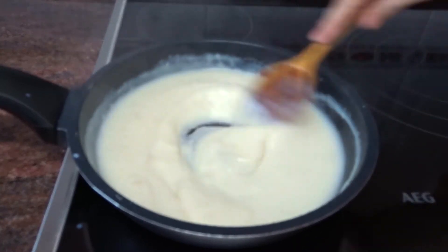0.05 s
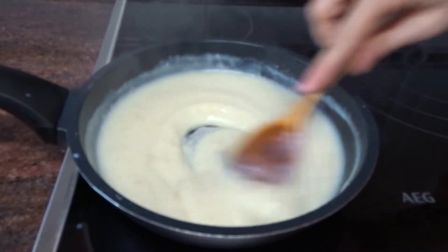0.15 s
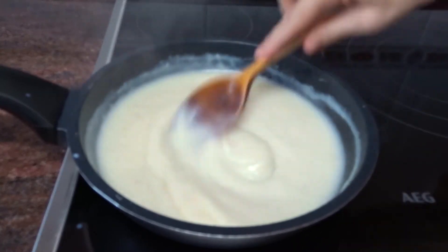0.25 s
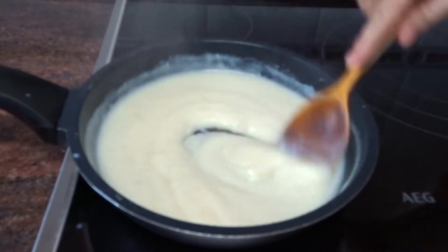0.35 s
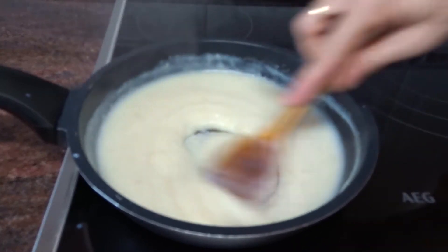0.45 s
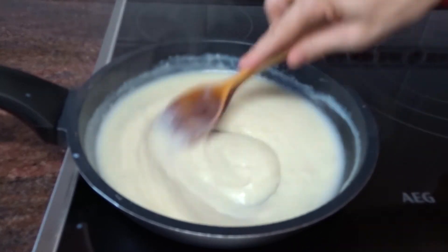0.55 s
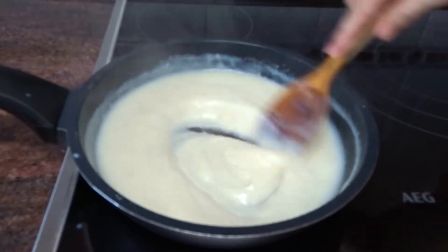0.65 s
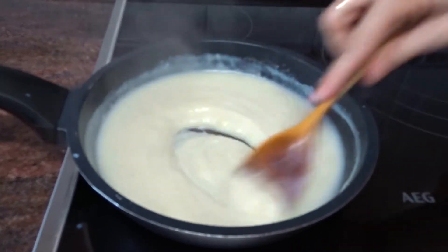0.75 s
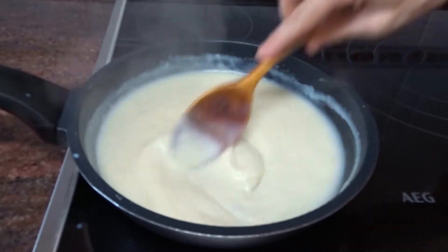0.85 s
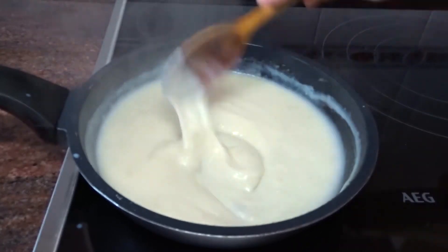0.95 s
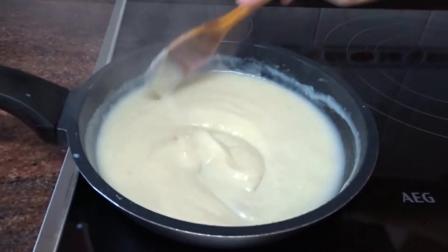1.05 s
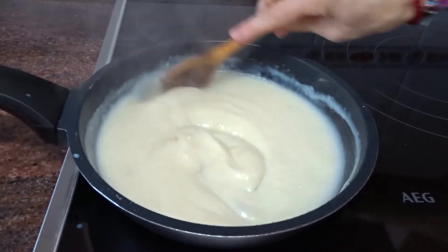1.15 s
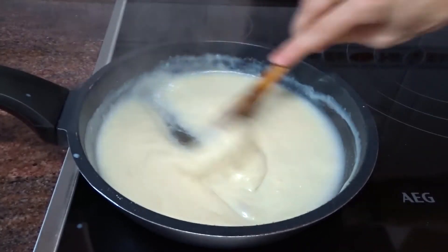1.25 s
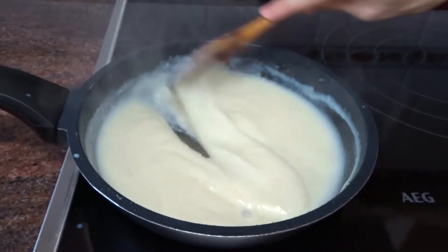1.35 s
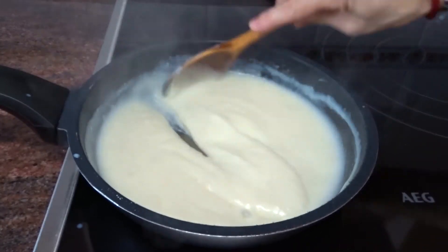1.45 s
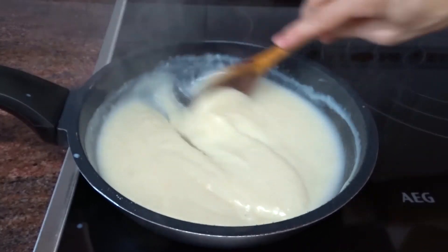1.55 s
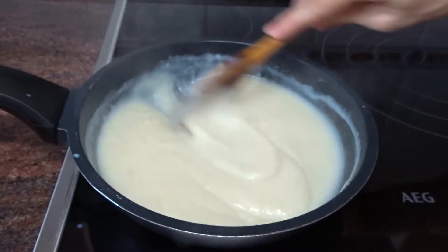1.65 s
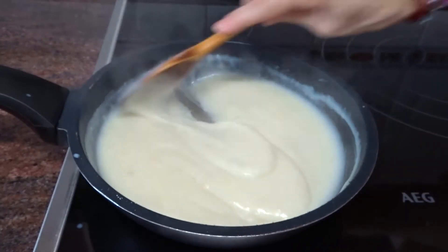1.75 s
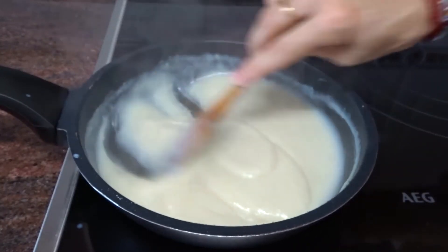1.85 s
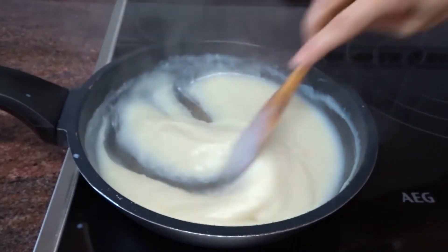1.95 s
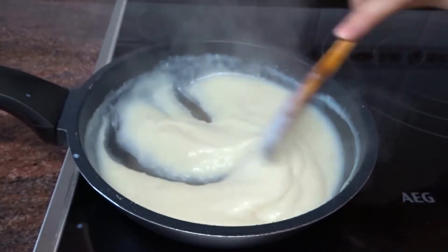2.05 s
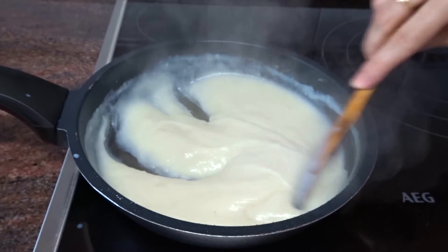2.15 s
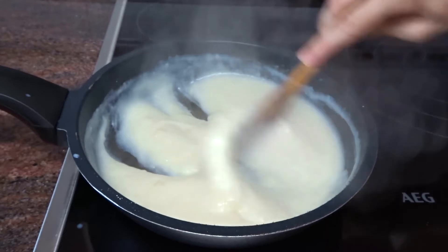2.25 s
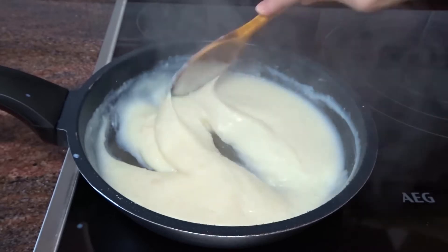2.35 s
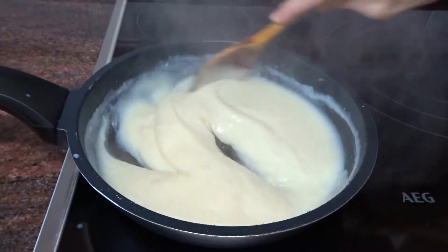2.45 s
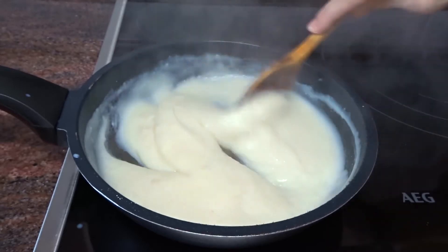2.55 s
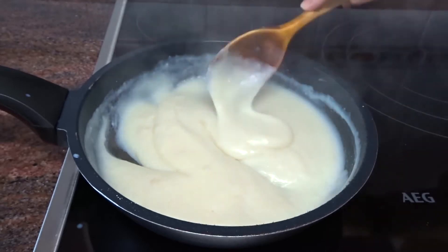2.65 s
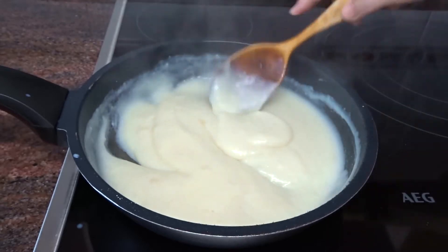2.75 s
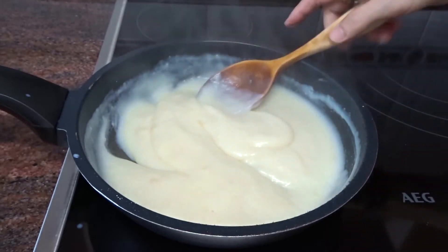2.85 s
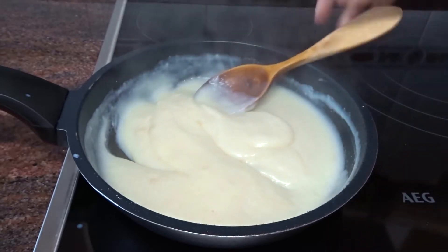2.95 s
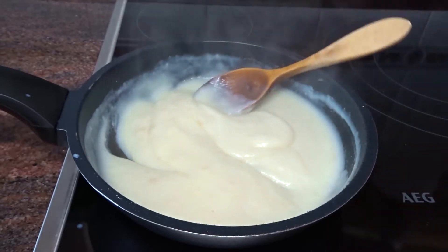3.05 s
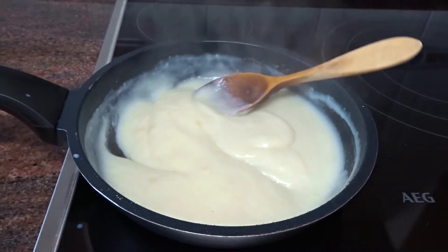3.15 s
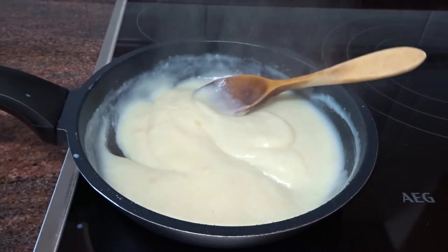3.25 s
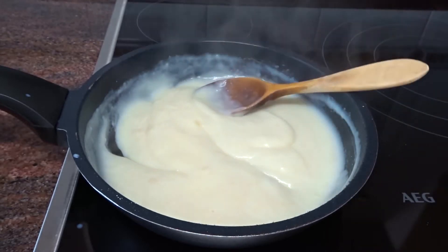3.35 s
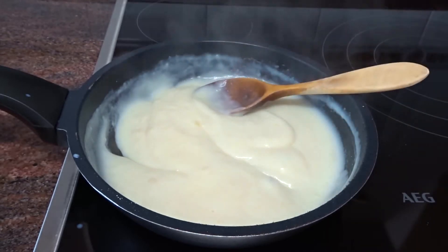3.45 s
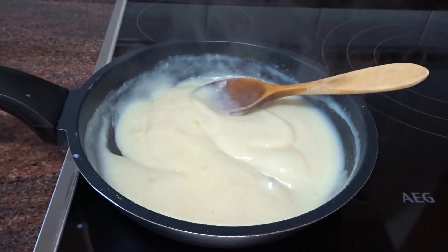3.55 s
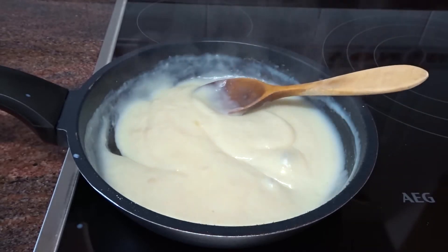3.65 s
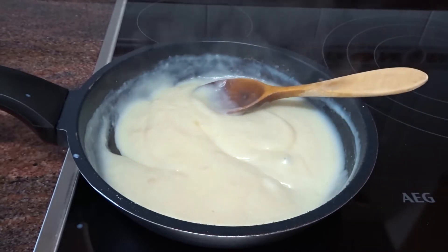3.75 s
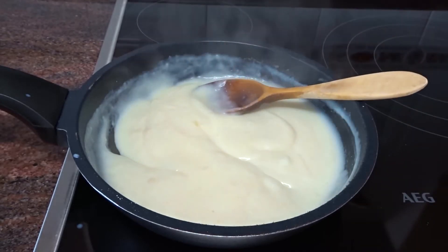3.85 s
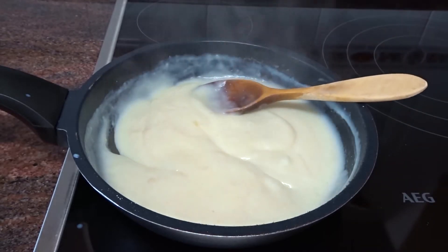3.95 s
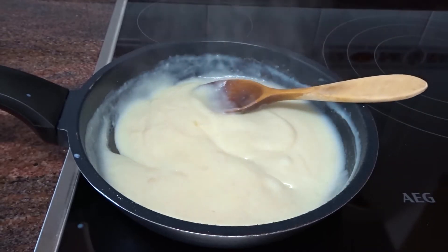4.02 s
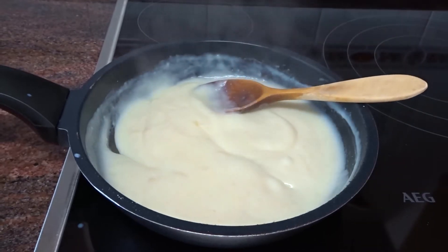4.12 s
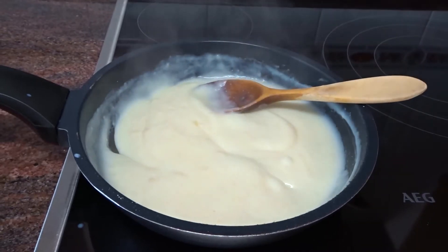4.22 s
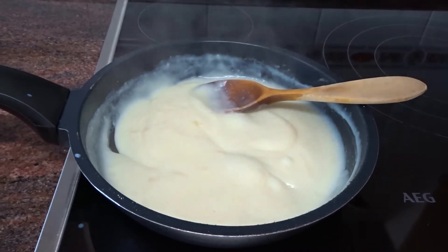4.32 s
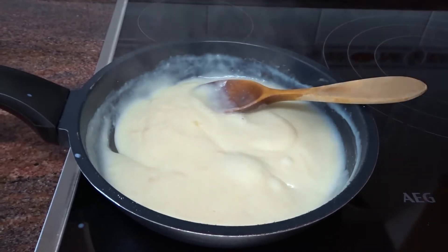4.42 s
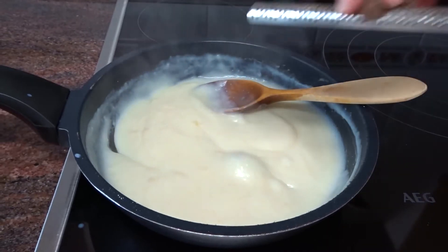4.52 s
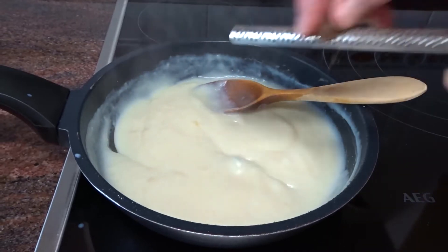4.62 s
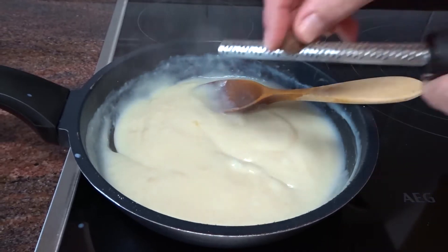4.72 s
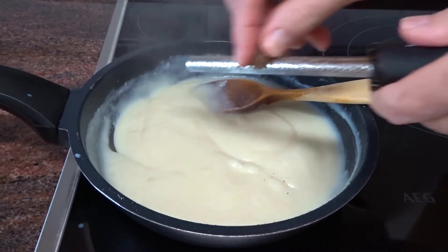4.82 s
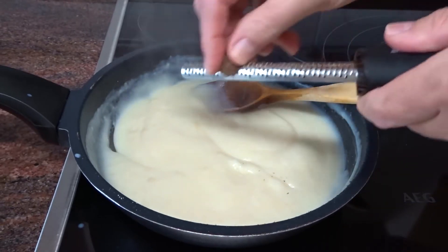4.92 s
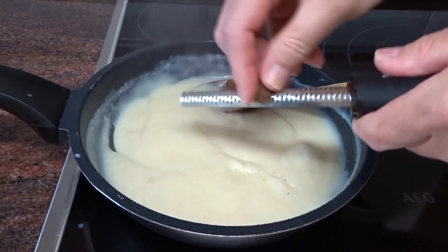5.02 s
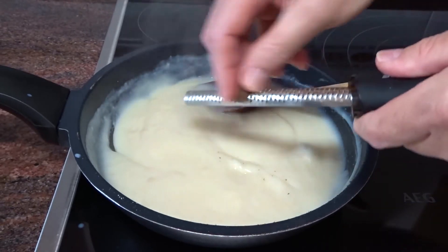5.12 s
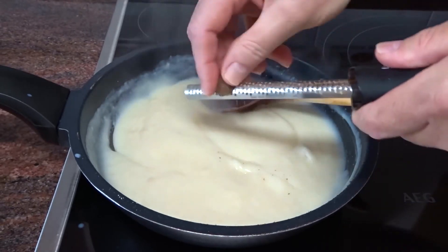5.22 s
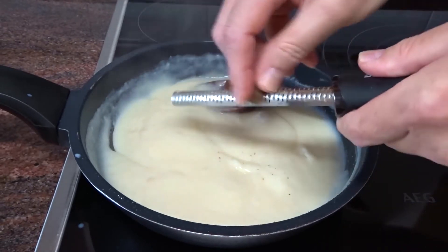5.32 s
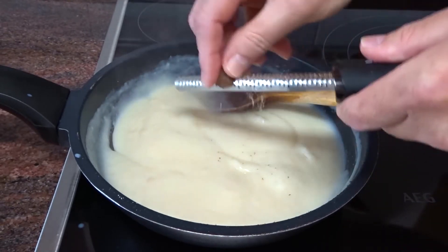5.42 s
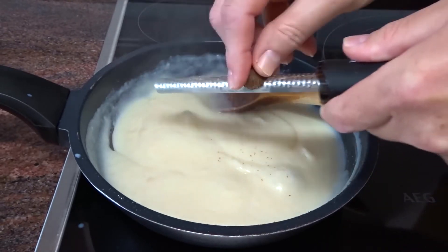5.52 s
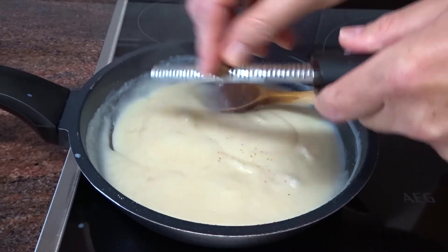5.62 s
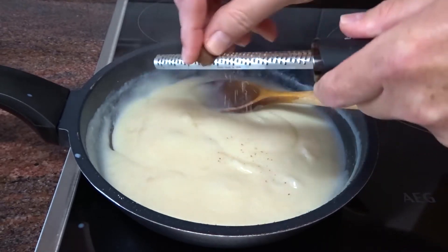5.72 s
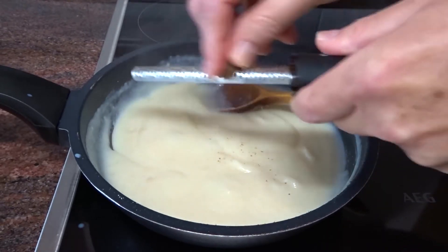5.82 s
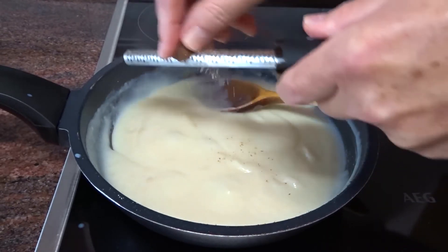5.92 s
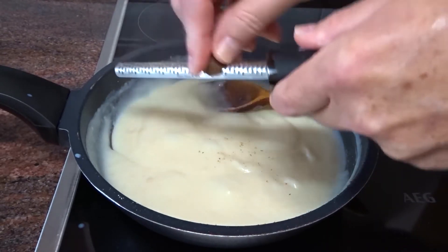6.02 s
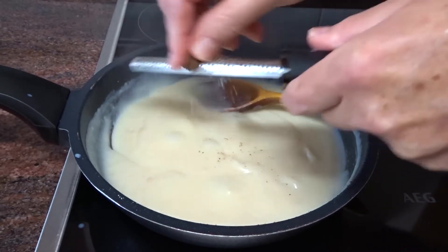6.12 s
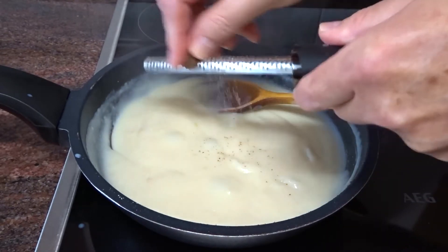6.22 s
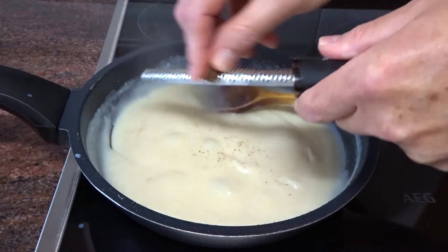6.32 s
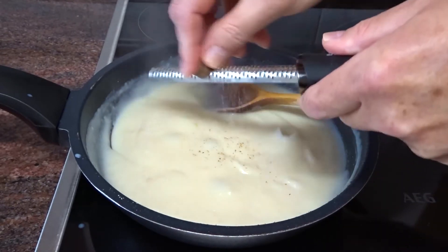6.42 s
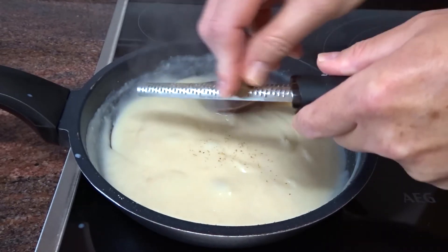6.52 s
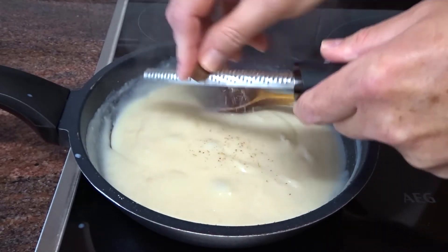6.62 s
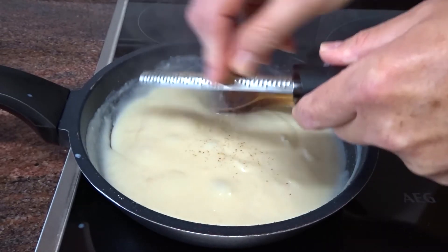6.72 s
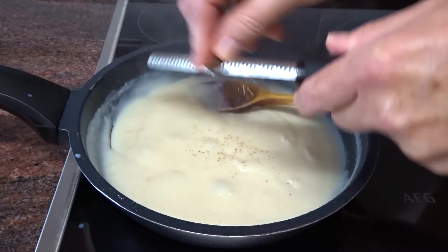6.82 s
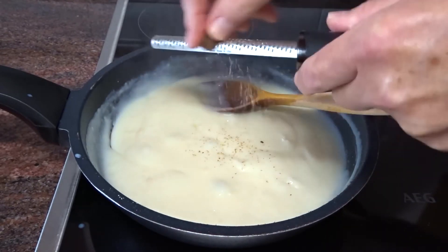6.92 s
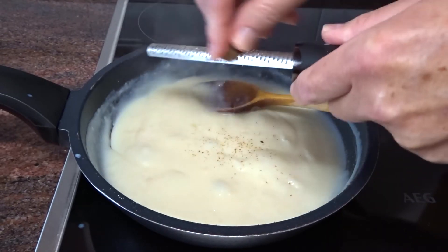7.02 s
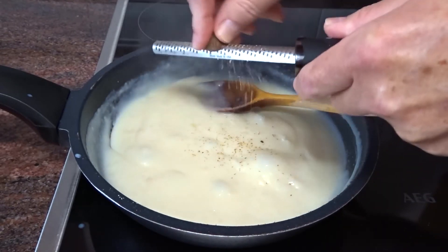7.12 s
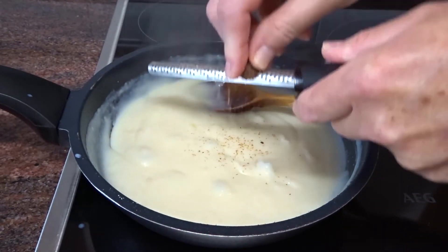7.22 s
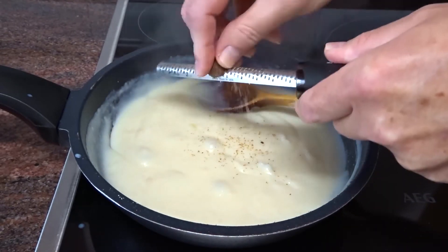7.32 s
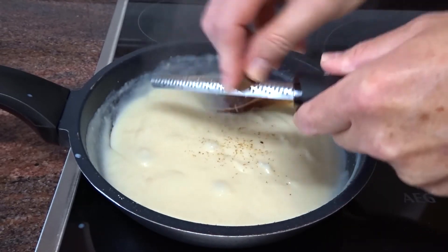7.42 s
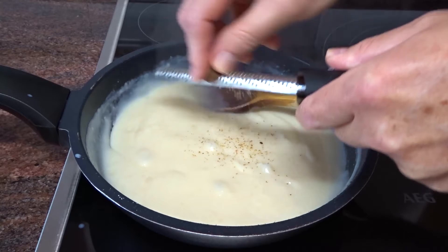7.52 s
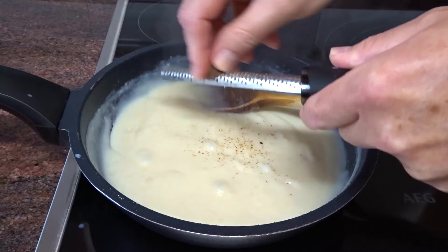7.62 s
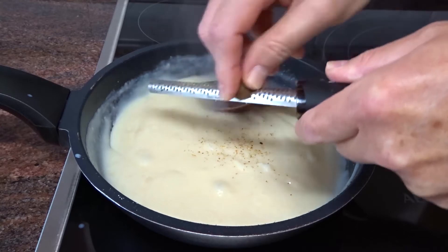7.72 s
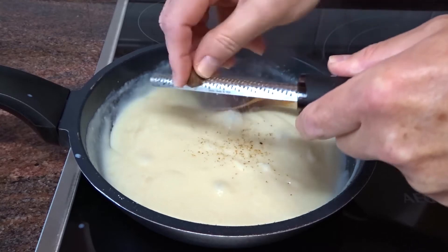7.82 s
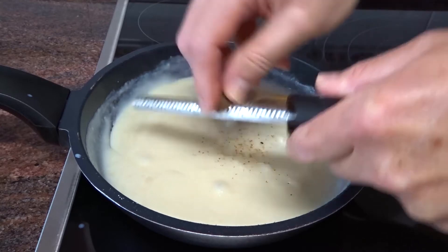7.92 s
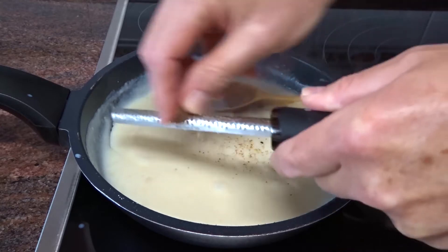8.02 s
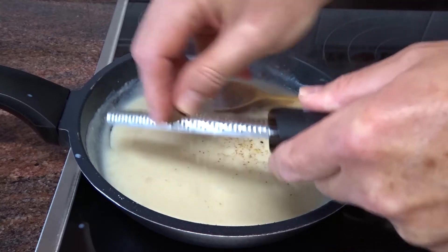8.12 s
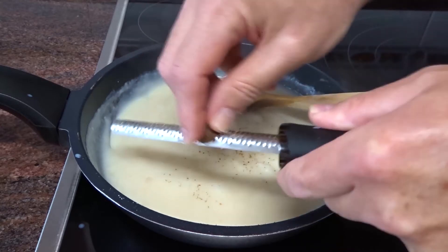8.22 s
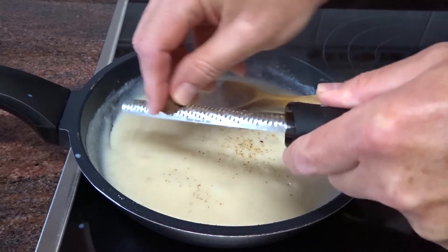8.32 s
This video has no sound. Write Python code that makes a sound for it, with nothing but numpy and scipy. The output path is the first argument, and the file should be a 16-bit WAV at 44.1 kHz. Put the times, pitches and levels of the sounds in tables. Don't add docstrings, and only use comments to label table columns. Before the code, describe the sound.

A close microphone in a small, hard-walled kitchen with a soft steady hum. From 0 to 1.3 seconds a wooden spoon pushes thick sauce over a heavy pan floor: wet hollow rumbles, stuttering scrapes and hiss. Wooden knocks strike the pan wall at about 1.4, 1.8, 2.1, 2.4 and 2.8 seconds; the fourth is hardest and brightest, each leaving a short metallic ring, with brief wet scrapes between. Around 3.1 the handle slides and clinks lightly on the rim. Until 4.5 it is nearly quiet, with faint scrapes, small pops and a low tap near 4.05. At about 4.6 grating starts faintly, growing full by 5.1: dry, bright, toothy strokes to and fro, roughly eight a second, pushes usually stronger than pulls. The blade buzzes and rings slightly, with little pings as teeth snag, continuing to the end at about 8.4 seconds.

```python
import sys
import numpy as np
from scipy import signal
from scipy.fft import rfft, irfft, next_fast_len
from scipy.io import wavfile
from scipy.ndimage import uniform_filter1d

SR = 44100
rng = np.random.default_rng(int(sys.argv[2]) if len(sys.argv) > 2 else 0)


def volts(x):
    e = np.asarray(x, float) / 20
    return 10 ** e


def generate_wav(sig):
    pcm = np.round(np.clip(np.atleast_2d(sig).T, -1, 1) * 32767).astype(np.int16)
    wavfile.write(sys.argv[1], SR, pcm)


N = 369116

# (frequency [Hz], side re mid [dB])
STEREO_WIDTH = [(60, -14), (110, 2), (200, -16), (380, -14), (700, -14.5), (1290, -8), (2380, -7),
                (4400, -4), (8120, -0.5), (15000, -2)]


def rms_one(x):
    return x / np.sqrt(np.mean(x ** 2) + 1e-20)


def at_hz(points, hz):
    table_hz, values = np.transpose(points)
    return np.interp(np.log(hz + 1), np.log(table_hz), values)


def colour(x, spectrum):
    size = next_fast_len(N)
    gain = volts(at_hz(spectrum, np.fft.rfftfreq(size, 1 / SR)))
    return irfft(rfft(x, size) * gain, size)[..., :N]


def butter(x, order, hz, kind):
    return signal.sosfilt(signal.butter(order, hz, kind, fs=SR, output="sos"), x)


def split(x, low_hz, high_hz):
    cuts = [(low_hz, "low"), ([low_hz, high_hz], "band"), (high_hz, "high")]
    return [np.roll(rms_one(butter(x, 3, hz, kind)), 999 * k, axis=1) for k, (hz, kind) in enumerate(cuts)]


def drift(rate):
    r = np.exp(-80 * np.pi * rate / SR)
    slow = signal.lfilter([1], [1, -2 * r, r * r], rng.standard_normal(N // 40 + 2002))[2000:]
    return np.interp(np.arange(N) / 40, np.arange(len(slow)), rms_one(slow))


def ring(x, hz, t60):
    r, w = volts(-60 / (t60 * SR)), 2 * np.pi * hz / SR
    return signal.lfilter([0, np.sin(w)], [1, -2 * r * np.cos(w), r * r], x + 1e-18)


def resonate(x, hz, width):
    r = np.exp(-np.pi * width / SR)
    top = [(1 - r * r) / 2, 0, (r * r - 1) / 2]
    return rms_one(signal.lfilter(top, [1, -2 * r * np.cos(2 * np.pi * hz / SR), r * r], x))


def wavering(x, peaks, patchy_db, rate, db_per_octave=0):
    out = 0
    for hz, width, db in peaks:
        level_db = db + patchy_db * drift(rate) + db_per_octave * np.log2(hz / 4700)
        out = out + volts(level_db) * resonate(x, hz, width)
    return rms_one(out)


def contacts(per_s, spread_db):
    sizes = volts(spread_db * np.minimum(rng.exponential(1, (2, N)), 4)) * rng.standard_normal((2, N))
    grains = rms_one(sizes * (rng.random((2, N)) < per_s / SR))
    grains[1] = colour(grains[1], STEREO_WIDTH)
    return grains


def swells(rows, attack_s, release_db_per_s):
    t, power = np.arange(N) / SR, np.zeros(N)
    for s, hold, db in rows:
        span = slice(max(int(s * SR), 0), int((s + hold + .5) * SR))
        age = t[span] - s
        rise = np.sin(np.pi / 2 * np.clip(age / attack_s, 0, 1)) ** 2
        power[span] += (rise * volts(db - release_db_per_s * np.maximum(age - attack_s - hold, 0))) ** 2
    return np.sqrt(power)


def spoon_drag():
    # (frequency [Hz], density [dB per Hz])
    drag_colour = [(71, -67), (120, -77), (249, -36), (312, 3.5), (794, 10.5), (1080, 0.5), (1520, 10.5),
                   (1980, 4), (2910, 4.5), (3790, -3.5), (4940, -5), (12800, -14), (15400, -15.5)]
    # (start [s], hold [s], rumble [dB], pitch of the wet hollow [Hz])
    shoves = np.array([(-.03, 0.031, -43.5, 685), (0.04, 0.12, -48.5, 825), (0.173, 0.16, -46, 736),
                       (0.357, 0.041, -44.5, 850), (0.458, 0.15, -46.5, 715), (0.684, 0.12, -44.5, 760),
                       (0.937, 0.027, -56.5, 724), (1.137, 0.072, -44, 1040), (1.501, 0.021, -43, 1041),
                       (1.85, 0.034, -42, 1030), (2.174, 0.032, -44.5, 955), (2.415, 0.013, -37.5, 990),
                       (2.874, 0.023, -61, 880), (3.279, 0.022, -57.5, 816), (3.668, .08, -74, 1170),
                       (3.875, .03, -62, 760), (3.934, 0.036, -60, 1240), (4.048, 0.033, -47.5, 930),
                       (4.336, 0.0067, -65, 1130), (4.545, 0.038, -58, 1070)])
    # (start [s], hold [s], scrape [dB], hiss re scrape [dB])
    skids = np.array([(-.03, 0.066, -49.5, 0.5), (0.03, 0.066, -42, -3), (0.19, 0.014, -41.5, -5.5),
                      (0.299, 0.082, -42.5, -1.5), (0.486, 0.073, -45.5, -7.5), (0.621, 0.056, -45, 1),
                      (0.68, 0.13, -49, -10), (0.853, 0.14, -55, -2.5), (1.24, 0.024, -56.5, 4),
                      (1.427, 0.062, -49.5, -5), (1.486, 0.15, -55, -7), (1.742, 0.02, -51.5, 4.5),
                      (2.096, .02, -70.5, 18), (2.178, 0.088, -47, -29), (2.263, 0.2, -72, 12),
                      (2.495, 0.0081, -45.5, -6), (2.6, 0.15, -64, -2.5), (3.016, 0.16, -59, -17),
                      (3.614, 0.14, -57.5, -7), (3.978, 0.033, -73, 12.5), (4.142, 0.16, -62.5, -1)])
    # (frequency [Hz], width [Hz], level [dB])
    pan_floor = [(1600, 140, -2.5), (1930, 200, -2.5), (2240, 130, 3.5), (2920, 380, -0.5),
                 (3870, 420, -3.5), (4760, 240, -15.5)]
    # (start [s], hold [s], level [dB])
    rim_slides = [
        (2.96, .01, -64.5),
        (3.065, 0.1, -61),
    ]
    shove_attack_s, skid_attack_s, skid_release_db_per_s = .025, .03, 142.5
    shove = swells(shoves[:, :3], shove_attack_s, release_db_per_s=168)
    skid = swells(skids[:, :3], skid_attack_s, skid_release_db_per_s)
    hiss_rows = skids[:, :3] + skids[:, 3:] * [0, 0, 1]
    hiss = swells(hiss_rows, skid_attack_s, skid_release_db_per_s)
    scrape_gain = np.hypot(skid, volts(-9) * shove)
    hiss_gain = np.hypot(hiss, volts(-36) * shove)

    grains = contacts(per_s=7800, spread_db=2.6)
    low, middle, high = split(colour(grains, drag_colour), low_hz=1500, high_hz=4560)
    hollow_hz = np.interp(np.arange(N) / SR, shoves[:, 0] + shove_attack_s, shoves[:, 3])
    hollow = sum(resonate(grains, hz, .14 * hz) * volts(-70 * np.log2(hz / hollow_hz) ** 2)
                 for hz in np.geomspace(480, 1450, num=7))
    stutter = drift(26)
    tightness = volts(9 * np.log2(hollow_hz / 850))
    rumble = (0.87 * low + 0.59 * tightness * hollow) * volts(1.64 * drift(9.4))
    scrape = .8 * middle + .55 * wavering(grains, pan_floor, patchy_db=2.5, rate=8)
    sound = shove * rumble
    sound += scrape_gain * scrape * volts(2.2 * stutter)
    sound += hiss_gain * high * volts(1.9 * stutter)

    rim = ring(grains[0], 1170, .6) + 0.66 * ring(grains[0], 597, 0.2) + 0.49 * ring(grains[0], 4670, 0.16)
    song = swells(rim_slides, 0.055, 240) * rms_one(rim)
    return volts(-7.5) * sound + volts(1.0) * grips(grains) + song * [[1], [.2]]


def grips(grains):
    # (middle [s], length [s], level [dB], frequency [Hz])
    grip_rows = [(.005, .03, -49, 1740), (.045, 0.063, -53.5, 1690), (.1, .1, -53, 1530),
                 (.09, 0.059, -52, 3100), (.12, 0.11, -50.5, 2800), (0.085, .05, -56, 4900),
                 (0.16, .05, -58.5, 4100), (.22, .07, -53, 2270), (.232, .051, -55, 4400),
                 (.4, .08, -51, 1560), (0.46, .1, -56.5, 2770), (.372, .061, -52.5, 4900),
                 (.56, .07, -55.5, 3000), (.56, .05, -53, 1480), (0.84, 0.044, -55, 1850),
                 (0.82, .045, -61, 4700), (.73, .08, -50.5, 2380), (.735, .07, -54, 2850),
                 (.72, .05, -52, 1580), (.815, .085, -52.5, 926), (1.2, .11, -48.5, 1170),
                 (1.21, 0.1, -47, 950), (1.2, 0.12, -52, 2240), (1.21, 0.073, -56.5, 1770),
                 (1.555, 0.075, -43.5, 1226), (1.55, 0.074, -44.5, 917), (1.54, 0.063, -53, 3360),
                 (1.545, 0.068, -54, 4150), (4.63, 0.13, -59.5, 2460), (4.63, 0.15, -59, 4600),
                 (4.65, .1, -55, 5500), (4.51, 0.099, -62.5, 4400)]
    out = np.zeros((2, N))
    for s, length, db, hz in grip_rows:
        size = int(length * SR * 1.5)
        at = int(s * SR) - size // 2
        rubbing = grains[:, N // 2 + at // 3:][:, :size]
        swell = volts(db) * np.hanning(size) * resonate(rubbing, hz, 0.088 * hz)
        out[:, max(at, 0):at + size] += swell[:, max(-at, 0):]
    return out


def room_tone():
    # (frequency [Hz], level [dB])
    hum_colour = [(88, -72), (215, -26), (297, -10.5), (502, -5.5), (587, -0.5), (901, -4), (2340, -2.5),
                  (8640, -19), (11100, -89), (11800, -70), (15800, -74)]
    # (time [s], level [dB])
    lull = [
        (3.3, 0),
        (3.45, -3.5),
        (3.6, -2.5),
        (3.7, -2.5),
        (4.0, 0),
    ]
    tone = rms_one(colour(rng.standard_normal((2, N)), hum_colour) * volts([[0], [-4.0]]))
    lull_db = np.interp(np.arange(N) / SR, *np.transpose(lull))
    tone = volts(-64.5 + 0.11 * drift(2.3) + lull_db) * tone
    tone[1] -= 0.22 * tone[0]
    return tone


def ticks():
    # (time [s], peak [dB], frequency [Hz], t60 [s])
    pops = [(0.5395, -34, 2120, 0.0048), (0.605, -33, 2100, 0.0044), (0.9906, -43, 4930, 0.0052),
            (1.4227, -17.5, 5500, 0.00096), (1.4226, -27, 3260, 0.0012), (1.7, -39, 1600, .005),
            (4.358, -48, 3600, 0.0027), (1.351, -50, 1320, 0.0058), (2.391, -42, 2520, 0.0055),
            (1.6569, -41.5, 3500, 0.003), (1.7, -34.5, 3080, 0.0026), (2.5334, -38.5, 2160, 0.0067),
            (3.1596, -46, 2053, 0.047), (3.159, -37, 3300, 0.0018), (3.4853, -45.5, 2470, 0.0045),
            (3.9885, -35.5, 2140, 0.003), (4.4378, -42, 4660, 0.0049)]
    # (time [s], peak [dB], frequency [Hz], t60 [s])
    plops = [
        (1.148, -50, 1120, 0.0078),
        (1.525, -31.5, 1186, 0.033),
        (1.898, -23, 1175, 0.005),
        (3.298, -52, 1160, 0.021),
        (4.054, -26.5, 990, 0.0044),
        (4.357, -44.5, 1500, 0.0094),
        (4.576, -48, 1190, 0.017),
        (6.402, -29, 1240, 0.0055),
    ]
    # (time [s], peak [dB], frequency [Hz], t60 [s])
    clink = [
        (3.158, -40.5, 2660, 0.016),
        (3.161, -52, 4370, .012),
        (3.163, -50, 5960, 0.023),
    ]
    # (time [s], peak [dB], frequency [Hz], t60 [s])
    snags = [(5.0765, -26, 4500, 0.006), (5.0936, -34, 2170, 0.028), (5.2183, -28, 2150, 0.028),
             (5.2692, -30, 2200, 0.028), (5.339, -22.5, 4700, .006), (6.300, -25, 4400, .006),
             (5.7306, -37, 2290, 0.031), (5.7501, -33.5, 2160, 0.028), (5.8364, -33, 2110, 0.031),
             (6.0717, -41, 2110, 0.028), (6.0789, -36, 2330, 0.028), (6.2011, -43, 2115, 0.028),
             (6.2202, -33, 2080, 0.026), (6.4128, -28.5, 2380, 0.028), (6.463, -35, 2100, 0.028),
             (6.5513, -34, 2360, 0.028), (6.5573, -32.5, 2280, 0.028), (6.664, -30, 2220, 0.032),
             (6.782, -35, 2190, 0.025), (6.7947, -34, 2800, 0.028), (6.8077, -23.5, 2335, 0.034),
             (6.9184, -39, 2200, 0.028), (6.9374, -35.5, 2240, 0.03), (6.9604, -42, 2190, 0.026),
             (7.0332, -31.5, 2080, 0.028), (7.1504, -35, 2100, 0.031), (7.2352, -27, 4300, 0.008),
             (7.2652, -28, 2150, 0.028), (7.37, -27.5, 2120, 0.028), (7.473, -37, 2140, 0.028),
             (7.6099, -30, 2070, 0.028), (7.7346, -37, 2050, 0.031), (7.7456, -31, 2080, 0.03),
             (7.763, -25, 2020, 0.023), (7.7845, -19, 2060, 0.015), (7.8567, -25.5, 2540, 0.021),
             (7.8688, -30, 2090, 0.028), (7.9909, -33, 2200, 0.028), (8.1197, -29, 2197, 0.028),
             (8.1352, -26, 2160, 0.017), (8.2311, -33, 1750, 0.028), (8.2669, -28.5, 2150, 0.028)]
    softer_snags = [(s, db - 9, hz, t60) for s, db, hz, t60 in snags]
    out, click = np.zeros(N), np.zeros(2000)
    click[0] = 1
    for s, db, hz, t60 in pops + plops + clink + softer_snags:
        at = round((s + 0.00066) * SR)
        upper = ring(click, min(hz * 1.81, 14000), t60 * 0.51)
        out[at:at + 2000] += volts(db + 0.5) * (ring(click, hz, t60) - 0.66 * upper)
    return butter(out, 2, [450, 11000], "band")


def knocks():
    knock_s = [1.4280, 1.7630, 2.1280, 2.4078, 2.7968]
    # (peak [dB], knock [Hz], knock t60 [s], crack [dB], hob thump [dB])
    blows = [
        (-22, 1430, 0.0063, -21, -59),
        (-16.5, 1630, 0.0056, -11.5, -53),
        (-17.5, 1970, 0.015, -22, -77),
        (-5, 2200, 0.0031, -11, -50),
        (-18.5, 1940, 0.007, -23.5, -52.5),
    ]
    # (base rings [dB], wall rings [dB], rim rings [dB], place along the rim [radians])
    landings = [
        (-6, -18, -18, 0.54),
        (-2, -5, -21, 0.797),
        (-10, -12, -19, 0.42),
        (0.5, 2, 9.5, 0.5),
        (-19, -8.5, -14, 0.8),
    ]
    blow_top_hz = [12000, 9000, 7000, 8000, 4800]
    # (frequency [Hz], t60 [s], level [dB])
    base = [(454.7, 0.32, -37.5), (565, 0.38, -49.5), (703, 0.07, -48), (930, 0.045, -45.5),
            (1075, 0.12, -42.5), (1137, 0.1, -29), (1181, 0.21, -33.5), (1240, 0.37, -48.5),
            (1470, 0.65, -76), (1750, 0.071, -27.5)]
    # (frequency [Hz], t60 [s], level [dB])
    wall = [(1830, 0.089, -39), (1877, 0.046, -57.5), (1920, 0.17, -35), (1950, 0.086, -42),
            (2360, 0.021, -29), (2533, 0.29, -37), (2650, 0.45, -37.5), (2820, 0.12, -29.5),
            (3090, 0.062, -28.5)]
    # (frequency [Hz], t60 [s], level [dB])
    rim = [(3900, 0.2, -56), (4200, 0.049, -48), (4840, 0.12, -47.5), (5030, 0.1, -56), (6700, 0.18, -68.5)]
    # (which blow [index], frequency [Hz], level [dB], t60 [s])
    accents = [(0, 1284, -32, 0.028), (0, 1850, -30.5, 0.012), (0, 3030, -38, 0.036), (1, 896, -35.5, 0.15),
               (1, 1170, -32.5, 0.2), (1, 3130, -36, .14), (1, 3350, -40, .07), (2, 998, -35, .15),
               (2, 1150, -29, 0.077), (2, 1900, -34.5, 0.14), (2, 2120, -25, 0.03), (3, 880, -27.5, 0.044),
               (3, 1736, -27, .06), (3, 2060, -30.5, 0.11), (3, 2900, -41, 0.11), (3, 4530, -36, .05),
               (4, 882, -34, 0.076), (4, 1190, -27, 0.042), (4, 2460, -30.5, 0.066),
               (4, 4110, -39.5, 0.073), (4, 4570, -40, 0.025), (4, 2620, -34.5, 0.06),
               (4, 1500, -37, 0.036), (1, 2050, -43, .07), (1, 2346, -35.5, 0.07), (3, 4280, -30, 0.03),
               (2, 3060, -41.5, .14), (2, 3300, -42, .03), (4, 2980, -33, .02), (4, 3618, -44, .06),
               (4, 215, -66.5, 1.1), (2, 1660, -30, 0.036), (2, 1418, -35, 0.088), (4, 1720, -32.5, .06),
               (1, 443, -44.5, 0.18), (4, 452, -52.5, 0.26)]
    # (frequency [Hz], t60 [s], level [dB])
    hob = [(218, .25, -10), (200, .25, -11), (165, .25, -17), (255, .15, -14)]
    out, click = np.zeros(N), np.zeros(int(.8 * SR))
    click[:9] = np.hanning(9) / 4
    fade = volts(-60 * np.arange(len(click)) / SR / 0.027)
    judders = rng.standard_normal((len(blows), len(click))) * fade * volts(-30)
    for k, (db, knock_hz, knock_t60, crack_db, thump_db) in enumerate(blows):
        wood = ring(click, knock_hz, knock_t60) - 1.76 * ring(click, knock_hz * 0.58, knock_t60 * 0.38)
        crack = ring(click, 2900, 0.0014) + 0.38 * ring(click, 4200, 0.0036)
        blow = volts(db) * wood + volts(crack_db) * crack

        base_db, wall_db, rim_db, place = landings[k]
        modes = [(*mode, base_db) for mode in base]
        modes += [(*mode, wall_db) for mode in wall]
        modes += [(*mode, rim_db) for mode in rim]
        for m, (hz, t60, mode_db, part_db) in enumerate(modes):
            node_db = 4 * np.cos((m + 1) * place)
            struck = ring(click + judders[k] * 0.28 / t60, hz, t60 * 0.36)
            blow += (-1) ** m * volts(mode_db + part_db + node_db) * struck
        for which, hz, mode_db, t60 in accents:
            if which == k:
                blow += volts(mode_db) * ring(click + 0.71 * judders[k], hz, t60)
        for hz, t60, level_db in hob:
            blow += volts(thump_db + level_db) * ring(click + judders[k], hz, t60)
        at = round(knock_s[k] * SR)
        out[at:at + len(blow)] += butter(blow, 3, blow_top_hz[k], "low")
    return out


def grater():
    # (start [s], length [s], level [dB], lean to the end [dB])
    pushes = [(4.59, 0.083, -48.5, 7.5), (4.824, 0.089, -44, 7), (5.078, 0.091, -40.5, 2.5),
              (5.335, 0.085, -39, 1.5), (5.572, 0.098, -40, 2), (5.832, 0.079, -39, 6.5),
              (6.073, 0.081, -36, 3), (6.296, 0.078, -39, 6), (6.543, 0.081, -37.5, 2.5),
              (6.782, 0.082, -35, 6.5), (7.016, 0.081, -36.5, 4.5), (7.234, 0.084, -40, 8.5),
              (7.476, 0.1, -39, 1), (7.727, 0.087, -38, 5), (7.978, 0.1, -40.5, 0),
              (8.223, 0.094, -37, 0.5)]
    # (start [s], length [s], level [dB], lean to the end [dB])
    pulls = [(4.725, 0.092, -56.5, -5), (4.955, 0.078, -45, 9), (5.21, 0.077, -41.5, 4),
             (5.458, 0.065, -42, 3.5), (5.711, 0.07, -42, 2), (5.961, 0.066, -43.5, 2),
             (6.207, 0.084, -45.5, -8.5), (6.418, 0.087, -42.5, -1.2), (6.659, 0.075, -43, 5),
             (6.917, 0.072, -43, -3.5), (7.134, 0.067, -45, -3), (7.368, 0.072, -44.5, -5),
             (7.621, 0.072, -43.5, -2), (7.854, 0.084, -43.5, -2), (8.114, 0.06, -42.5, 2.5),
             (8.345, 0.045, -40.5, 7)]
    # (low ring of the blade [dB], brightness of the steel [dB per octave])
    stroke_tones = [(-65, -5), (-66, -6), (-56, -3), (-50.5, -2), (-51, -7), (-42, -7.5), (-51, -1),
                    (-47, -6.5), (-53, 5), (-48, -4), (-53, 15.5), (-47.5, 0), (-45.5, -2), (-48.5, 2.5),
                    (-48, 11), (-45, -0.5), (-47.5, 9), (-49.5, -4), (-43, 0), (-43.5, -4.5), (-44, 5),
                    (-47.5, -1), (-53.5, -2.5), (-47, -4), (-47, -2), (-44, -1), (-44, 0), (-45, 4),
                    (-52, 2), (-47, -8), (-50, 9), (-40.5, -2)]
    # (time [s], hiss [dB])
    approach = [
        (4.62, -15),
        (4.9, -10.5),
        (5.08, -4.5),
    ]
    # (frequency [Hz], density [dB per Hz])
    rasp_colour = [(120, -75), (200, -18), (364, -34.5), (676, -14), (825, -19), (955, -10.5),
                   (1050, -11.5), (1710, 0), (1900, -0.5), (2120, -7), (2550, -2.5), (4240, -5.5),
                   (6670, -13), (14100, -19), (15400, -19.5)]
    # (frequency [Hz], width [Hz], level [dB])
    blade_low = [(2050, 50, -5), (2130, 50, 0), (2200, 50, -3), (2310, 80, -10)]
    # (frequency [Hz], width [Hz], level [dB])
    blade_high = [(2910, 110, -7), (3900, 280, -2), (4280, 300, -1), (4490, 1200, 2), (4800, 350, 1),
                  (5450, 380, 3), (6100, 300, -7), (7900, 1200, -12)]
    # (frequency [Hz], width [Hz], level [dB])
    teeth = [(7440, 900, 1), (8820, 930, -3), (13970, 3000, 3)]
    t, speed, shake = np.arange(N) / SR, np.zeros(N), np.zeros(N)
    strokes = np.stack([pushes, pulls], axis=1).reshape(-1, 4)
    ring_db, steel_tilt = np.transpose(stroke_tones)
    for k, (s, length, db, lean_db) in enumerate(strokes):
        span = slice(int((s - .1) * SR), int((s + length + .1) * SR))
        u = 2 * (t[span] - s) / length - 1
        bite = [6.5, 3.5][k % 2]
        fall_db = np.where(u < 0, 5.85 * np.abs(u) ** bite, 13.2 * np.abs(u) ** 2.04)
        stroke = volts(db - 0.5 + lean_db * u - fall_db)
        speed[span] += stroke
        shake[span] += stroke * volts(ring_db[k] - db)

    first_s = strokes[0, 0]
    middles = strokes[:, 0] + strokes[:, 1] / 2
    lead_in = volts(-56.0 - 72 * np.abs(t - first_s)) * (t < first_s + .03)
    lead_in *= np.clip((t - 4.46) / 0.033, 0, 1)
    touch = volts(-15.5 + np.interp(t, middles, strokes[:, 2])) * (t > first_s)

    grains = contacts(per_s=12000, spread_db=1.5)
    low, middle, high = split(colour(grains, rasp_colour), low_hz=2734, high_hz=7350)
    hiss_db = np.interp(t, middles, np.resize([-1.5, -2.5], len(strokes)))
    hiss_db += np.interp(t, *np.transpose(approach), right=0)
    brightness = np.interp(t, middles, steel_tilt)
    steel = wavering(grains, blade_high, patchy_db=4.2, rate=20, db_per_octave=brightness)
    grip = drift(18)
    body = 0.5 * middle + 0.9 * steel + volts(-9.5 + 0.24 * hiss_db + 2.48 * grip) * low
    blade = shake * wavering(grains, blade_low, patchy_db=3.0, rate=14) * [[.85], [.5]]
    clumps = drift(48)
    whistle = 0
    for k, (hz, width, db) in enumerate(teeth):
        patches = np.roll(grip, (k + 1) * N // 7)
        whistle = whistle + volts(db + 3.5 * patches) * resonate(grains, hz, width)
    high = (.75 * high + 0.52 * rms_one(whistle)) * volts(hiss_db + 1.5 * clumps[::-1])
    return (speed * volts(0.9 * clumps) + lead_in + touch) * (body + high) + blade


def kitchen(x, early_db, late_db, early_t60):
    # (frequency [Hz], t60 [s])
    kitchen_t60 = [(200, 0.4), (1000, 0.4), (4000, 0.28), (12000, 0.022)]
    t = np.arange(int(.6 * SR)) / SR
    white, echo = rng.standard_normal((2, 2, len(t))), 0
    for k, hz in enumerate(150 * 2 ** np.arange(0, 6.6, .5)):
        band = butter(white[k % 2], 2, [hz, min(hz * 2 ** .5, 20000)], "band")
        decay = volts(early_db - 60 * t / early_t60) + volts(late_db - 60 * t / at_hz(kitchen_t60, hz))
        side_db = min(at_hz(STEREO_WIDTH, hz) + .7, -3)
        echo = echo + band * decay * volts([[0], [side_db]])
    echo = echo * np.clip(t / 0.001 - .3, 0, 1)
    return signal.fftconvolve(x[None], echo, axes=1)[:, :N]


def scene():
    # (frequency [Hz], mid taken from side [dB])
    lean = [(300, -39.5), (1200, -26), (2400, -19), (5000, -34), (9000, -44.5)]
    rubbing = spoon_drag() + grater()
    small = ticks()
    blows = knocks() + small
    send = blows - 0.084 * small + volts(-10) * rubbing[0]
    mid, side = (rubbing * volts([[0], [-2.2]]) + blows * [[1], [-.03]] + room_tone()
                 + kitchen(send, early_db=-10.0, late_db=-28.5, early_t60=0.0067))
    side = side - colour(mid, lean)
    return np.array([mid + side, mid - side]) * volts([[0.05], [-0.05]])


def low_pass(x):
    return signal.sosfilt(signal.butter(12, 16580, fs=SR, output="sos"), x)


def record(dry):
    # (frequency [Hz], level re the mean line strength of the moment [dB])
    mask = [(150, -2), (250, -11), (500, -8), (1000, -7), (1500, -26), (6000, -36), (9000, -28),
            (12000, -21), (15000, -21)]
    # (frequency [Hz], level per line [dB])
    inaudible = [(235, -99), (290, -118), (8000, -125), (10500, -108), (15000, -100)]
    thin = butter(dry, 4, 215, "high")
    mid_side = np.array([thin[0] + thin[1], thin[0] - thin[1]]) / 2
    hz, _, lines = signal.stft(mid_side, SR, window="cosine", nperseg=2048)
    mean = np.sqrt(np.mean(np.abs(lines[0]) ** 2, axis=0))
    whim = np.repeat(rng.standard_normal((2, 129, len(mean))), 8, axis=1)[:, :len(hz)]
    limit_db = at_hz(mask, hz)[:, None] + 4.0 * whim + 4.5 * whim[0, 0] + [[[0]], [[-6.0]]]
    limit = np.maximum(mean * volts(limit_db), volts(at_hz(inaudible, hz)[:, None] + 4.5 * whim))
    around = uniform_filter1d(np.abs(lines), size=5, axis=1)
    strength = np.maximum(0.87 * np.abs(lines), around)
    lines = lines * (strength > limit) * (hz < 15830)[:, None]
    mid, side = signal.istft(lines, SR, window="cosine", nperseg=2048)[1][:, :N]
    return low_pass(np.array([mid + side, mid - side]))


dry = scene()
out = record(dry)
generate_wav(out)
```